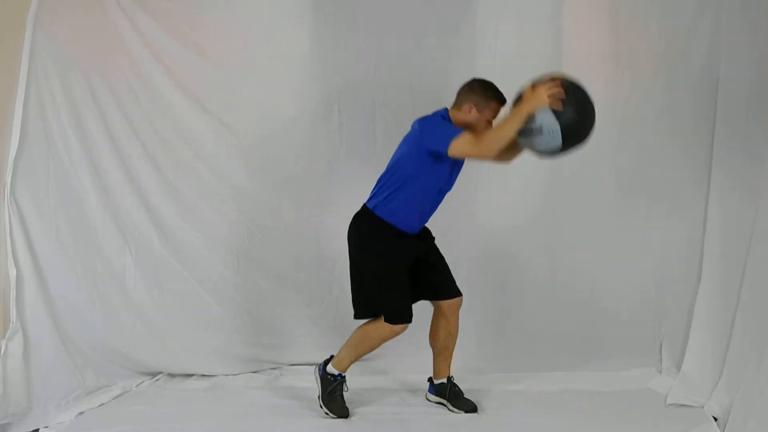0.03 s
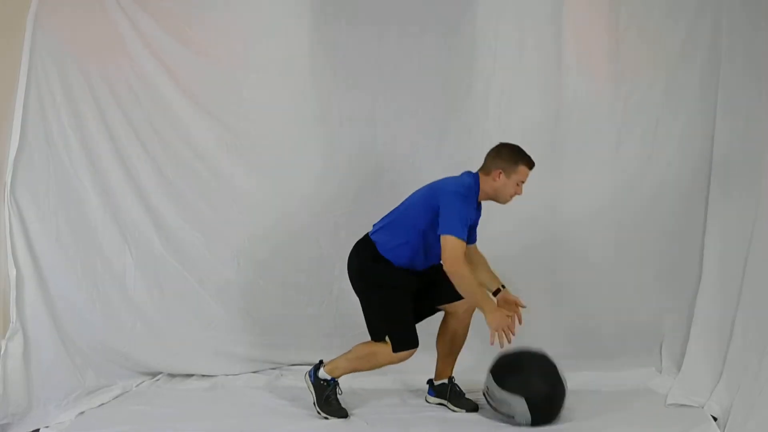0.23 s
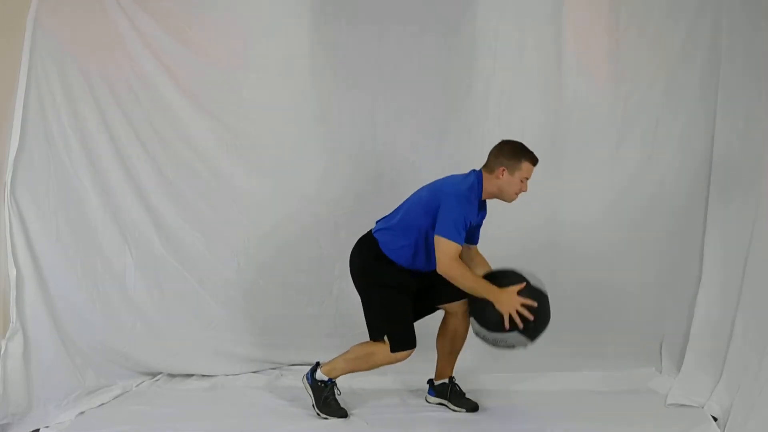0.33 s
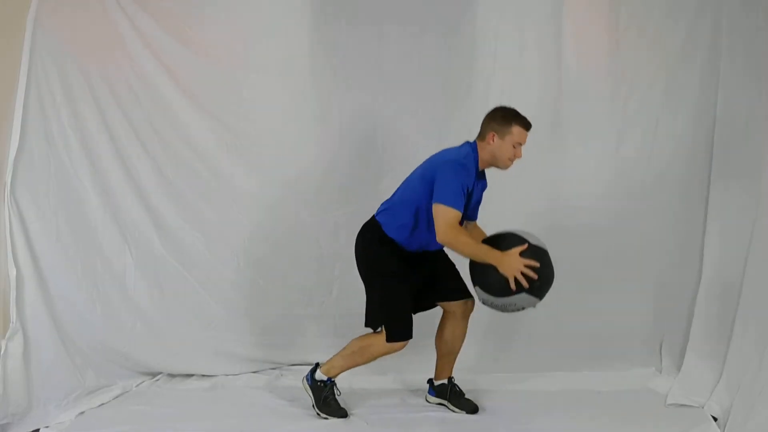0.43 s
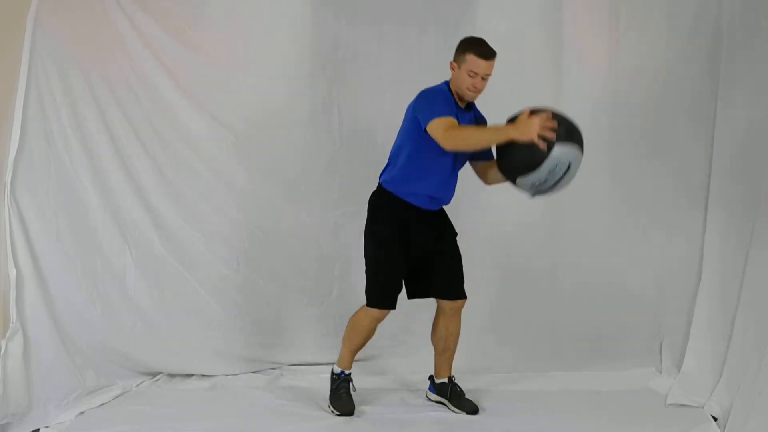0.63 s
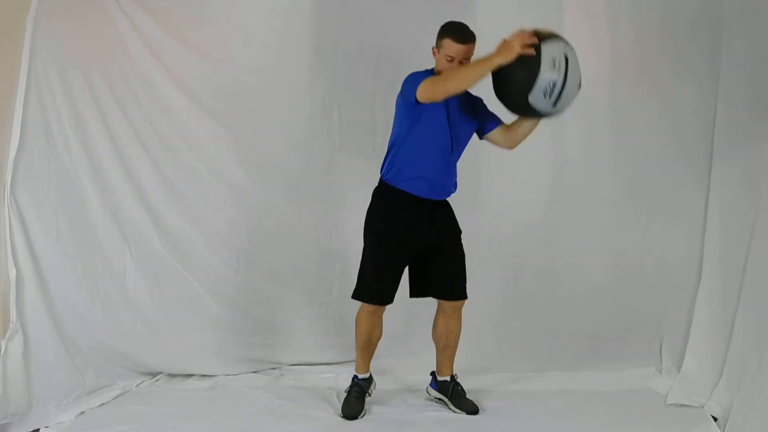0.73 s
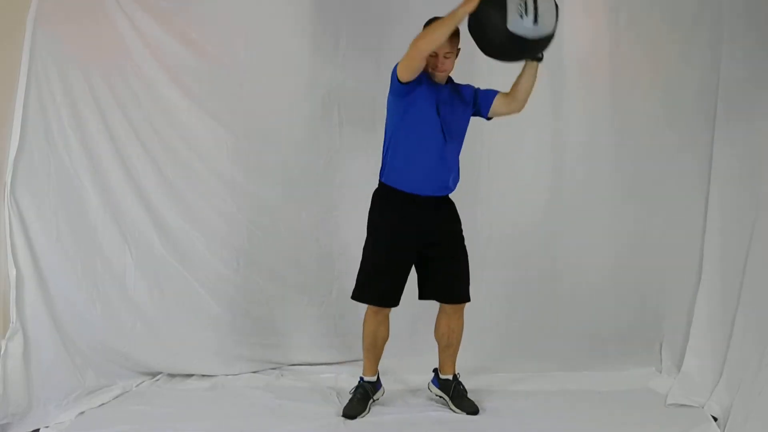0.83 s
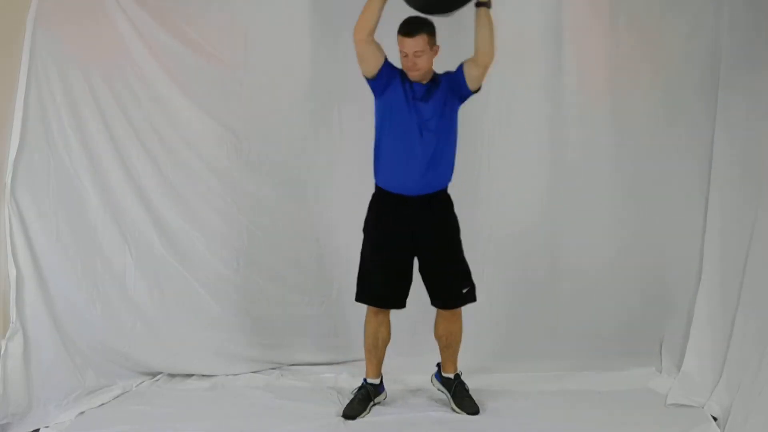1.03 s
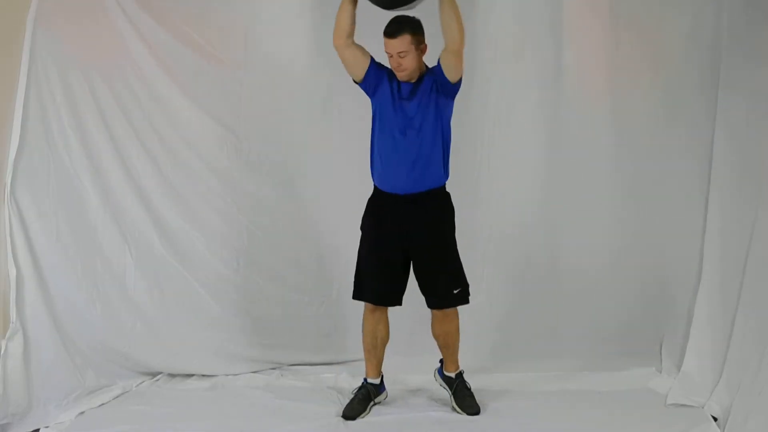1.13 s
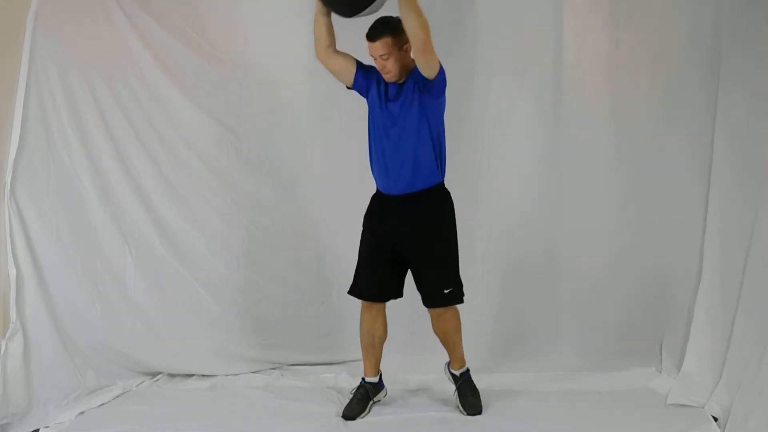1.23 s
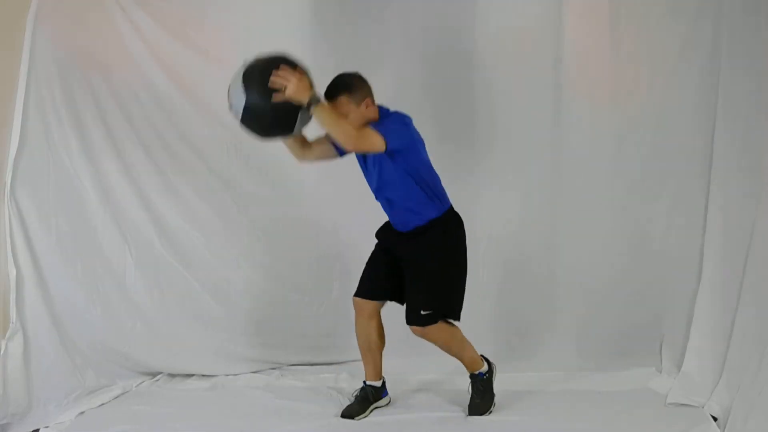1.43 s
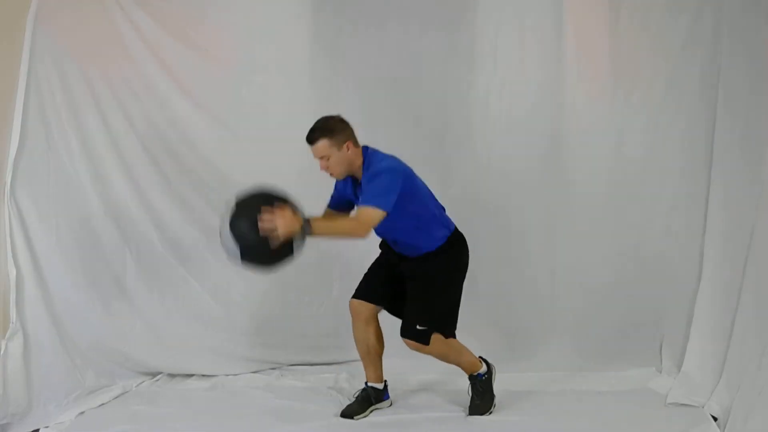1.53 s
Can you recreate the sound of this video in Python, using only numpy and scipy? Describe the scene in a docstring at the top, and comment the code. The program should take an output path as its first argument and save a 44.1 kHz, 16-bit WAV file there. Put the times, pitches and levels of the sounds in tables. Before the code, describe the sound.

A heavy rubber ball slams on a cloth-covered floor with a loud slap and short room ring.

```python
"""A heavy rubber ball, swung down and slammed on a cloth-covered floor in a small bare room.
The swing swishes as air and cloth noise; the slap is soft pushes and ringing modes under a bright crack.
Room and floor modes ring on as decaying sines over fading noise bands, and the floor sheet rustles.
Shoes scuff in rough slips and feet thump as smooth low pushes, over a room hush with a faint hum.
A close stereo pair of microphones hears it through a look-ahead limiter."""
import sys
import numpy as np
from scipy import signal
from scipy.io import wavfile
from scipy.ndimage import uniform_filter1d

SR = 44100
rng = np.random.default_rng(int(sys.argv[2]) if len(sys.argv) > 2 else 0)


def pcm_store(signal):
    """Save signal as 16-bit PCM."""
    levels = np.round(np.clip(np.atleast_2d(signal), -1, 1) * 32767)
    wavfile.write(sys.argv[1], SR, levels.astype(np.int16).T)


N = 70560  # samples, 1.6 s

# stereo width of diffuse sound: (frequency [Hz], difference against sum [dB])
DIFFUSE_WIDTH = [(25, -36), (60, -24.5), (125, -7), (250, -5), (500, -7.5), (1000, -3), (2000, -3),
                 (4000, 3), (15000, -2.5)]
# stereo width of the slam's crack and reflections: (frequency [Hz], difference against sum [dB])
SLAM_WIDTH = [(25, -38), (60, -35), (125, -30.5), (250, -18.5), (500, -14.5), (1000, -9), (2000, -1),
              (4000, 3), (8000, 1), (15000, 2.5)]
# swish and rustle of ball, arms and clothes: (time [s], level [dB])
SWISH_LEVEL = [(0, -63), (.07, -58), (.115, -45), (0.169, -47.5), (.2, -47), (.24, -47), (.3, -76),
               (.65, -60), (.675, -55), (0.721, -52.5), (0.772, -52), (.82, -57.5), (.92, -58),
               (1.05, -64.5), (1.25, -63.5), (1.37, -55), (1.45, -62), (1.522, -55), (1.535, -49.5),
               (1.6, -44.5)]
# spectrum of the swish: (frequency [Hz], relative density [dB per Hz])
SWISH_SPECTRUM = [(100, -19), (250, -7), (420, -4.5), (600, 1.5), (900, -5.5), (1200, 0.5), (1700, -7),
                  (2400, -12), (4000, -22), (8000, -29), (15000, -28)]
# steady hush of room and microphones: (frequency [Hz], relative density [dB per Hz])
HUSH_SPECTRUM = [(15, -48.5), (25, -6), (49, -2), (140, -13), (169, -6), (253, -8.5), (359, -10.5),
                 (1270, -10.5), (1800, -11.5), (1950, -10.5), (15500, -30)]
# shoe soles twisting on the cloth:
# (start time [s], length [s], level [dB], mean slip rate [Hz], sole resonance [Hz])
SCUFFS = [(0.115, 0.055, -49.5, 540, 1100), (0.667, 0.037, -51, 540, 556),
          (1.531, 0.076, -46.5, 412.4, 710)]
# spectrum of the room's answer: (frequency [Hz], relative density [dB per Hz])
ROOM_SPECTRUM = [(15, -44), (25, -12.5), (631, 2), (782, 3), (1380, -5.5), (1570, -2.5), (1900, -7),
                 (2120, -7.5), (3170, -13.5), (3830, -18), (15500, -41.5)]
# how long the room rings: (frequency [Hz], 60 dB decay time [s])
ROOM_DECAY = [(30, 0.67), (100, 0.56), (250, 0.49), (600, 0.39), (1500, 0.36), (4000, 0.32), (9000, 0.43),
              (15000, 0.49)]
# the slap and its first echoes off floor and walls: (time [s], level against the slap [dB])
SLAP_ARRIVALS = [(.2497, 0), (.2519, -1), (.2557, -5), (.2593, -10), (.2646, -7)]
# ringing modes of the ball skin: (frequency [Hz], level [dB], 60 dB decay time [s])
BALL_MODES = [(102, -12.5, 0.021), (464, -27, 0.01), (1130, -21.5, 0.018), (1298, 0, 0.016),
              (1958, -0.5, 0.024), (2456, 7.5, 0.0041), (4470, -5, 0.0089), (6500, -31.5, .003)]
# crack of rubber on cloth: (frequency [Hz], relative density [dB per Hz])
CRACK_SPECTRUM = [(800, -29), (2200, 5), (4500, -4.5), (7000, -10.5), (15000, -29.5)]
# ringing modes of room and floor: (frequency [Hz], level [dB], 60 dB decay time [s])
ROOM_AND_FLOOR_MODES = [(23.9, -27.5, 0.84), (97.9, -26.5, 0.54), (184.2, -28.5, 0.71), (250, -23, 0.56),
                        (289.3, -21, .5), (446.6, -20, 0.47), (530, -24, 0.53), (692, -17, 0.34),
                        (777, -16, 0.34), (875.6, -24, 0.32), (953, -40, 0.51), (1070, -14, 0.24)]
# floor sheet stirred by the blast of air, then settling: (time [s], level [dB])
SHEET_LEVEL = [(.25, -72.5), (.275, -46), (.31, -60.5), (.35, -47), (.40, -48), (.44, -68), (.5, -90)]
# spectrum of the sheet's rustle: (frequency [Hz], relative density [dB per Hz])
SHEET_SPECTRUM = [(2000, -17), (5000, 3.5), (9000, -1), (15000, -9.5)]
# feet pressing on the floor: (start time [s], peak before the bass cut [dB], length [s])
THUMPS = [(0.704, -52, 0.033), (0.794, -38.5, 0.026), (0.851, -55, 0.022), (0.86, -44, .025),
          (0.895, -47.5, 0.041), (0.974, -48, 0.013), (1.363, -62, 0.036)]

HUSH_DB, HUM_HZ, HUM_DB = -55.5, 59, -72
SCUFF_ATTACK_S, SOLE_T60_S = .005, .005
SLIP_RATE_WANDER = .09  # spread, as a share of the slip rate
ROOM_DB, ROOM_START_S, ROOM_RISE_S, ROOM_LUMPS_DB = -5.5, .2495, .00067, 2.5
SLAP_DB, PUSH_DB, PUSH_CORNER_HZ, SLAP_LOWPASS_HZ = -1, -13.5, 1500, 5030
LEFT_LAG_S = .00005
CRACK_DB, CRACK_T60_S = -7.5, .03
MODE_WAVER_DB = 1
THUMP_BASS_CUT_HZ = 19
LIMIT_DB, RELEASE_DB_PER_S, LOOK_AHEAD_S = -9, 54, .004
LIMIT_SHARE = .4  # share of the overshoot in dB that is taken off
CLIP_PEAK, TOP_CUT_HZ = .98, 15850


def amp(db):
    """Turns decibels into a linear gain."""
    return 10 ** (np.asarray(db) / 20)


def at_hz(points, hz):
    """Reads a table on a log-frequency axis."""
    table = np.array(points)
    return np.interp(np.log(hz), np.log(table[:, 0]), table[:, 1])


def drift(rate):
    """Slow random wander of spread 1: noise through a two-pole low-pass with its poles at rate [Hz]."""
    step = 40  # samples between computed points
    pole = np.exp(-2 * np.pi * rate * step / SR)
    noise = rng.standard_normal(N // step + 2002)
    slow = signal.lfilter([1], [1, -2 * pole, pole ** 2], noise)[2000:]
    return np.interp(np.arange(N) / step, np.arange(len(slow)), slow / slow.std())


def bands(spectrum, width, shape):
    """Half-octave bands of stereo noise, summing to rms 1 before each takes its own gain shape(hz)."""
    out, power = 0, 0
    edges = 20 * 2 ** np.arange(0, 10.1, .5)
    white = rng.standard_normal((2, 2, N + 8000))  # neighbouring bands use separate noise
    for k, (low, high) in enumerate(zip(edges, edges[1:])):
        bandpass = signal.butter(2, [low, high], "band", fs=SR, output="sos")
        mid, side = signal.sosfilt(bandpass, white[k % 2])[:, 8000:]
        hz = np.sqrt(low * high)
        wide, gain = amp(at_hz(width, hz)), amp(at_hz(spectrum, hz))
        power += gain ** 2 * (high - low) / SR * 2
        stereo = (mid + wide * side * [[1], [-1]]) / np.sqrt(1 + wide ** 2)
        out = out + gain * shape(hz) * stereo
    return out / np.sqrt(power)


def ring(clicks, hz, t60):
    """A damped resonance: a unit click sets a sine of starting height 1 ringing."""
    decay, turn = amp(-60 / (t60 * SR)), 2 * np.pi * hz / SR
    return signal.lfilter([0, np.sin(turn)], [1, -2 * decay * np.cos(turn), decay ** 2], clicks)


def swish():
    """Lumpy air and cloth noise that follows the body's motion."""
    time, db = np.transpose(SWISH_LEVEL)
    level = amp(np.interp(np.arange(N) / SR, time, db))
    together = drift(58)  # shared by all bands

    def lumps(hz):
        return amp(1.37 * together + 2.0 * drift(30))

    return level * bands(SWISH_SPECTRUM, DIFFUSE_WIDTH, lumps)


def hush():
    """Broad noise wavering slightly band by band, with a wavering mains hum."""
    hum = amp(HUM_DB + 2.0 * drift(11)) * np.sin(2 * np.pi * HUM_HZ * np.arange(N) / SR)
    noise = bands(HUSH_SPECTRUM, DIFFUSE_WIDTH, lambda hz: amp(1.0 * drift(5.6)))
    return amp(HUSH_DB) * noise + hum


def scuffs():
    """Slips of uneven strength at a wandering rate ring the sole; quick start, even hold, fading end."""
    t, out = np.arange(N) / SR, 0
    bass_cut = signal.butter(2, 300, "high", fs=SR, output="sos")
    for start, length, db, slip_hz, sole_hz in SCUFFS:
        rate = slip_hz * (1 + SLIP_RATE_WANDER * drift(50))
        turns = np.floor(np.cumsum(rate) / SR)
        # one click per whole turn; the tiny offset keeps the filters off denormal numbers
        slips = np.diff(turns, prepend=0) * amp(3.0 * rng.standard_normal(N)) + 1e-18
        sound = signal.sosfilt(bass_cut, ring(slips, sole_hz, SOLE_T60_S))
        attack = (t - start) / SCUFF_ATTACK_S
        fade = 2 * (start + length - t) / length  # falls over the second half
        shape = np.clip(np.minimum(attack, fade), 0, 1)
        out = out + amp(db) * shape * sound / sound.std()
    return out


def room():
    """Dense, uneven reflections of the slam build up at once and die band by band."""
    age = np.maximum(np.arange(N) / SR - ROOM_START_S, 0)
    rise = 1 - np.exp(-age / ROOM_RISE_S)

    def lumpy_decay(hz):
        return amp(ROOM_LUMPS_DB * drift(23.2) - 60 * age / at_hz(ROOM_DECAY, hz))

    return amp(ROOM_DB) * rise * bands(ROOM_SPECTRUM, SLAM_WIDTH, lumpy_decay)


def slaps():
    """Each arrival is a soft push plus the ball's modes; it reaches the right port a little first."""
    clicks = np.zeros((2, N)) + 1e-18
    for time, db in SLAP_ARRIVALS:
        left, right = int(time * SR), int((time - LEFT_LAG_S) * SR)
        clicks[[0, 1], [left, right]] = amp(SLAP_DB + db)
    pole = np.exp(-2 * np.pi * PUSH_CORNER_HZ / SR)
    push = signal.lfilter([np.e * (1 - pole)], [1, -2 * pole, pole ** 2], clicks)
    modes = sum(amp(db) * ring(clicks, hz, t60) for hz, db, t60 in BALL_MODES)
    soften = signal.butter(2, SLAP_LOWPASS_HZ, fs=SR, output="sos")
    return signal.sosfilt(soften, amp(PUSH_DB) * push + modes)


def crack():
    """Air squeezed out between rubber and cloth: a short bright burst of decaying noise."""
    age = np.arange(N) / SR - SLAP_ARRIVALS[0][0]
    decay = (age > 0) * amp(CRACK_DB - 60 * np.maximum(age, 0) / CRACK_T60_S)
    return decay * bands(CRACK_SPECTRUM, SLAM_WIDTH, lambda hz: 1)


def room_and_floor_modes():
    """One blow sets room and floor modes ringing as decaying sines, each wavering at random."""
    click = np.zeros(N) + 1e-18
    click[int(SLAP_ARRIVALS[0][0] * SR)] = 1
    out = 0
    for hz, db, t60 in ROOM_AND_FLOOR_MODES:
        out = out + amp(db + MODE_WAVER_DB * drift(12)) * ring(click, hz, t60)
    return out


def sheet():
    """Bright cloth rustle, stirred by the blast of air, that flickers in all bands together."""
    time, db = np.transpose(SHEET_LEVEL)
    level_db = np.interp(np.arange(N) / SR, time, db, left=-120)
    return amp(level_db + 2.0 * drift(60)) * bands(SHEET_SPECTRUM, DIFFUSE_WIDTH, lambda hz: 1)


def thumps():
    """Each shift of weight is one smooth push, with the bass cut's swing back after it."""
    t, pushes = np.arange(N) / SR, 1e-18
    for start, db, length in THUMPS:
        pushes = pushes + amp(db) * np.sin(np.pi * np.clip((t - start) / length, 0, 1)) ** 2
    bass_cut = signal.butter(2, THUMP_BASS_CUT_HZ, "high", fs=SR, output="sos")
    return signal.sosfilt(bass_cut, pushes)


def scene():
    """Mixes all the layers; mono ones sit in the centre."""
    motion_and_hush = swish() + hush() + scuffs() + thumps()
    slam = room() + slaps() + crack() + room_and_floor_modes() + sheet()
    return motion_and_hush + slam


def record(dry):
    """A look-ahead limiter ducks for the slam and recovers; peaks are clipped, the top is cut."""
    ahead = int(LOOK_AHEAD_S * SR) + 1
    level_db = 20 * np.log10(np.abs(dry).max(axis=0) + 1e-9)
    over = np.maximum(level_db - LIMIT_DB, 0) * LIMIT_SHARE
    # hold each peak's reduction, releasing along a straight line in dB
    ramp = RELEASE_DB_PER_S * np.arange(N) / SR
    held = np.maximum.accumulate(over + ramp) - ramp
    early = np.r_[held[ahead:], held[-ahead:]]
    duck_db = uniform_filter1d(early, size=ahead, mode="nearest")
    clipped = np.clip(dry * amp(-duck_db), -CLIP_PEAK, CLIP_PEAK)
    top_cut = signal.cheby2(16, 45, TOP_CUT_HZ, fs=SR, output="sos")  # 45 dB down from here up
    return signal.sosfilt(top_cut, clipped)


dry = scene()
out = record(dry)
pcm_store(out)
```